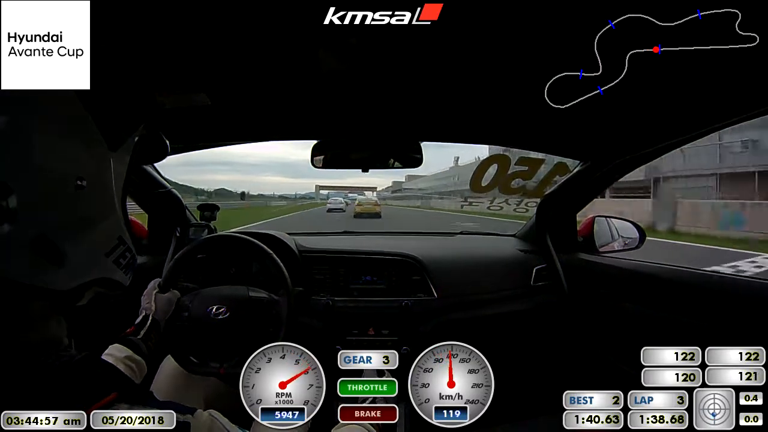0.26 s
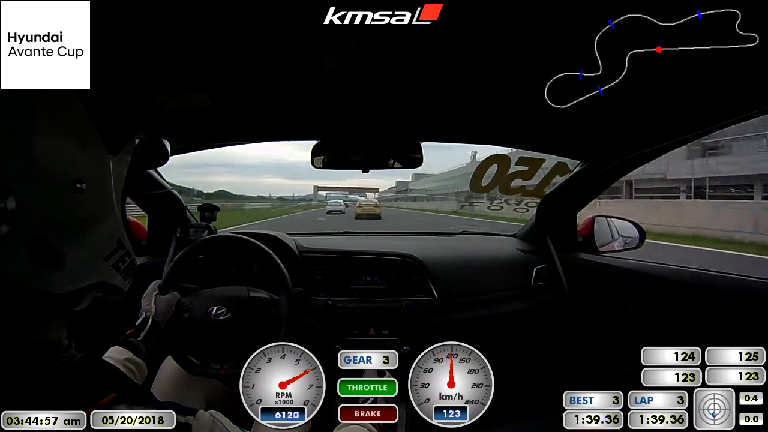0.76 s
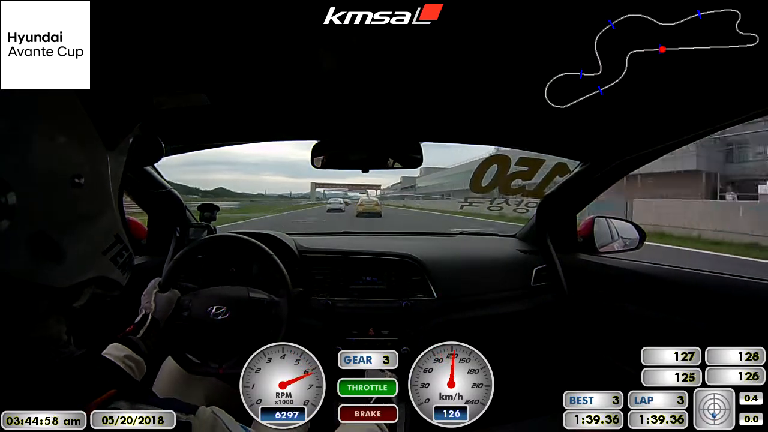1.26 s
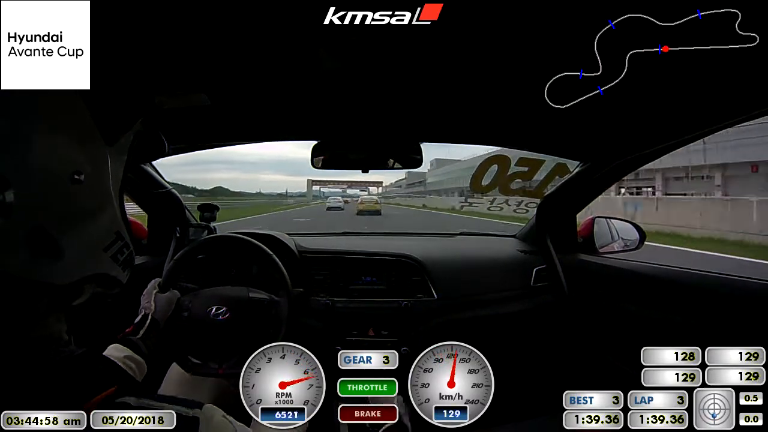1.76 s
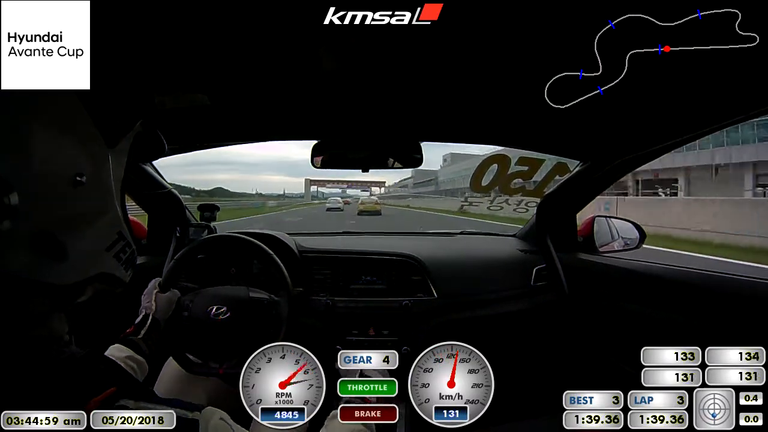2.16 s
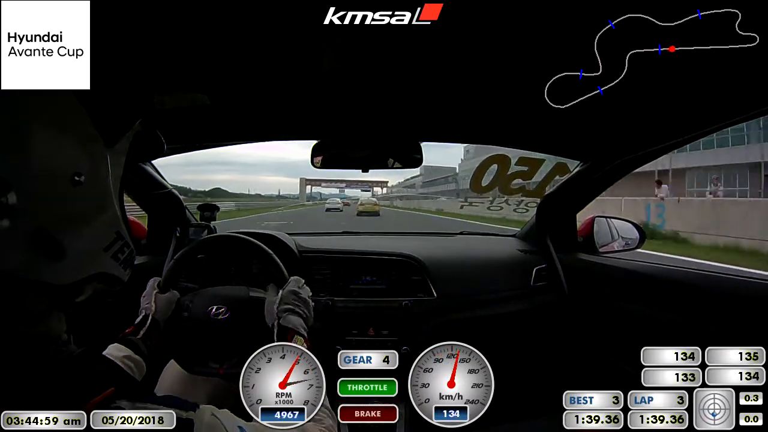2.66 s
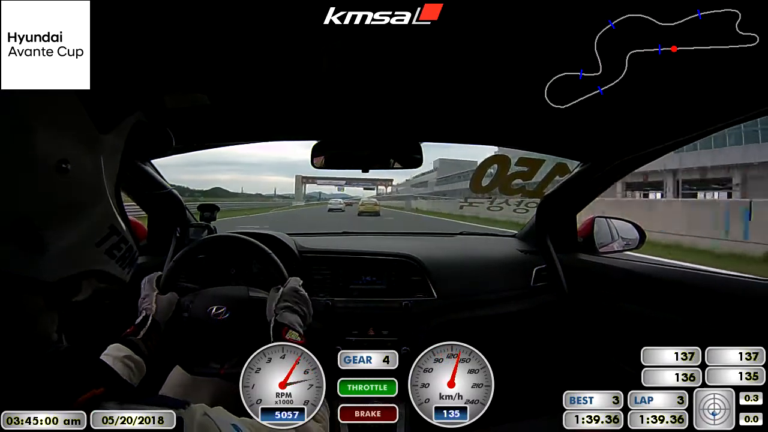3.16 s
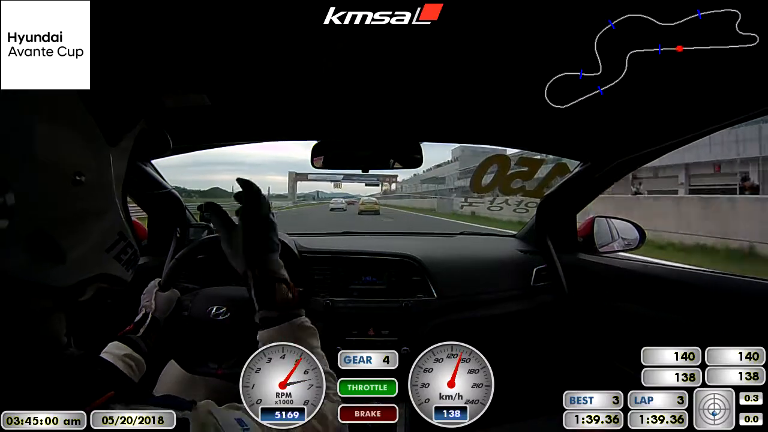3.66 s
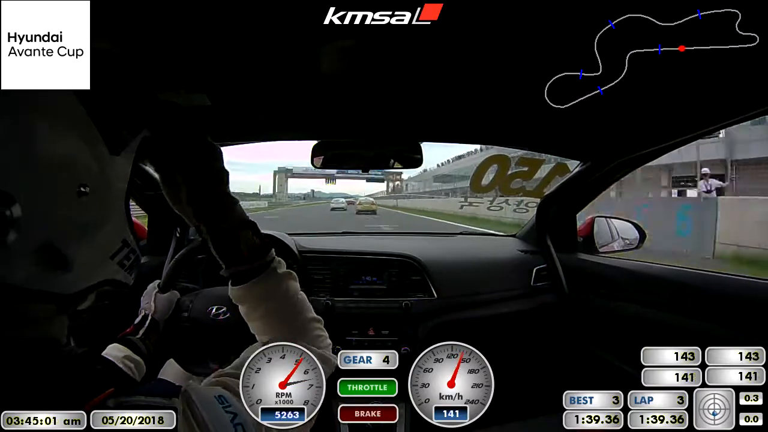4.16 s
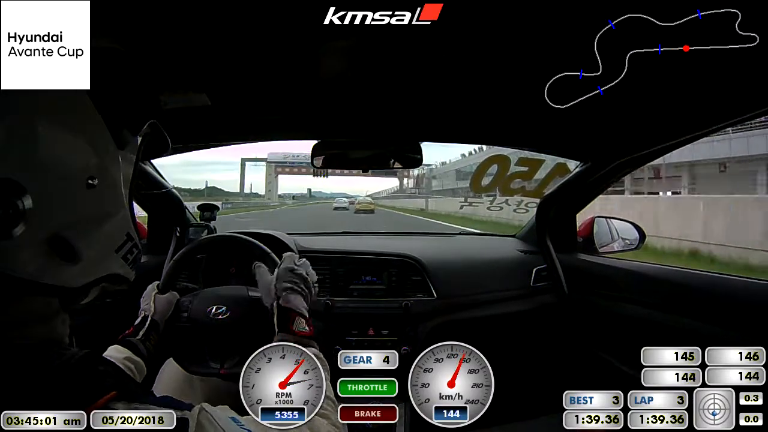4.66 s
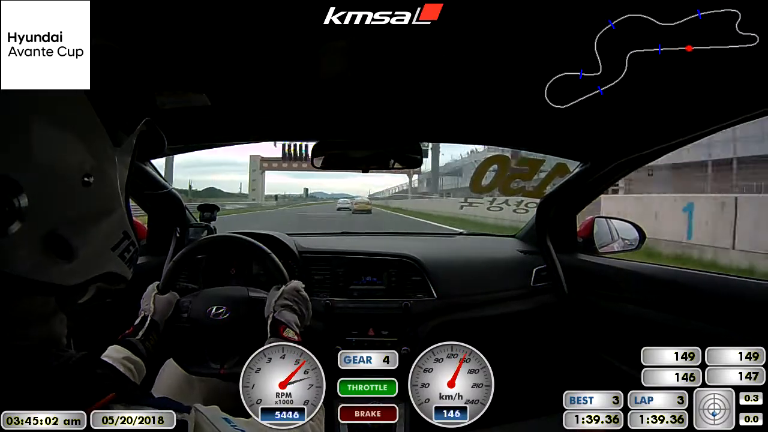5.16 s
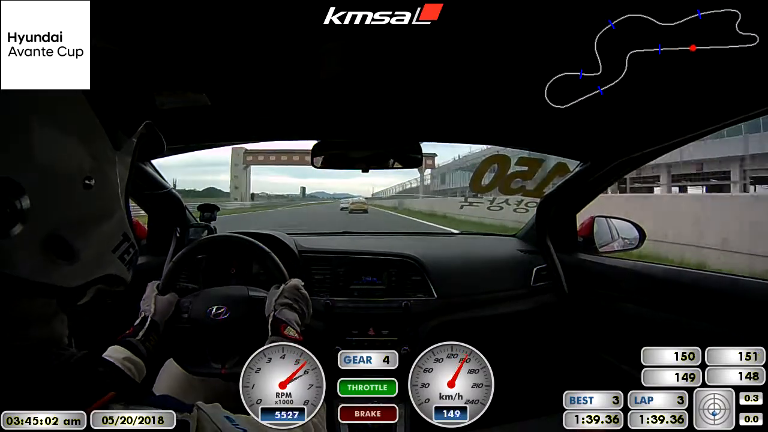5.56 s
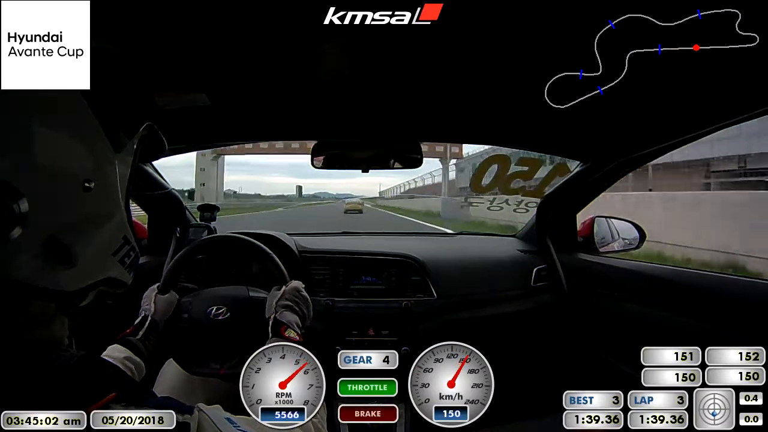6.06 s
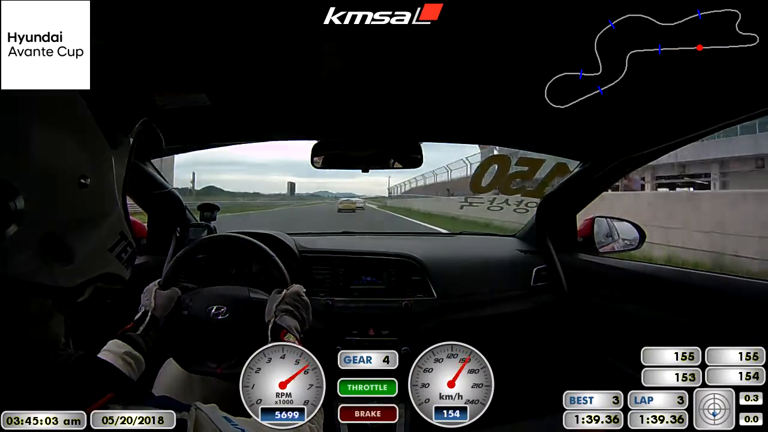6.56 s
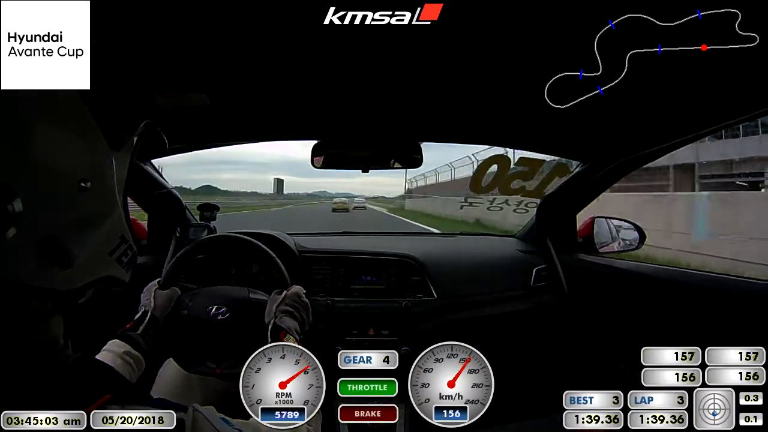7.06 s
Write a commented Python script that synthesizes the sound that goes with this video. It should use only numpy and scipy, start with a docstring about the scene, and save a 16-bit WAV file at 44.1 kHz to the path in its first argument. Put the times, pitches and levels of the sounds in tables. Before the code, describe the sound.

Muffled cabin sound of a racing car accelerating down a straight: low engine drone, one quick gear change, trim knocks, tyre rumble and wind.

```python
"""A four-cylinder engine pulls, shifts up once and pulls again inside a stripped race car on a straight.
Engine and exhaust are sines locked to the firing rate, tyres are sines locked to the wheels.
Road and wind are filtered noise; road joints and loose trim ring short decaying tones.
Engine, road, wind and a light patter pass body resonances and padding; the other sounds are added directly.
A low boom shakes the shell, a small metal part buzzes, and the recorder adds hiss and a faint whine."""
import sys
import numpy as np
from scipy import signal
from scipy.fft import rfft, irfft, next_fast_len
from scipy.io import wavfile
from scipy.ndimage import uniform_filter1d, map_coordinates

SR = 44100
rng = np.random.default_rng(int(sys.argv[2]) if len(sys.argv) > 2 else 0)


def materialize(psi):
    """Save the field psi as 16-bit PCM at rate SR to the path in sys.argv[1].

    A 1-D psi becomes a single channel; in a 2-D psi each row is a channel.
    """
    bounded = np.clip(np.atleast_2d(psi).T, -1, 1)
    quanta = np.round(bounded * 32767).astype(np.int16)
    wavfile.write(sys.argv[1], SR, quanta)


def volts(x):
    """Linear amplitude factor 10**(x/20) for a level x in dB, scalar or array-like."""
    e = np.asarray(x, float) / 20
    return 10 ** e


N = 323253
T = np.arange(N) / SR  # time of every sample, s


def unit(x):
    """Scaled to rms 1."""
    return x / np.sqrt(np.mean(x ** 2) + 1e-20)


def noise():
    """Plain white noise."""
    return rng.standard_normal(N)


def curves(rows):
    """One value per sample for each column after the time."""
    time_s, *columns = np.transpose(rows)
    return [np.interp(T, time_s, column) for column in columns]


def wobble(rate):
    """A smooth random curve through rate random points a second."""
    points = rng.standard_normal(int(N * rate / SR) + 4)
    return map_coordinates(points, [T * rate])


def humps(middle_s, half_s, level_db):
    """Sum of bell-shaped swells."""
    rows = np.broadcast(middle_s, half_s, level_db)
    return sum(volts(db) * np.exp(-.5 * ((T - middle) / half) ** 2) for middle, half, db in rows)


def filtered(x, response):
    """x times a complex response of frequency."""
    size = next_fast_len(N + SR // 2)  # spare room for the ringing
    hz = np.fft.rfftfreq(size, 1 / SR)
    return irfft(rfft(x, size) * response(hz), size)[:N]


def modes(table):
    """Response of resonances that ring after a push, neighbours of opposite sign."""
    def one(f, centre, width, db):
        return volts(db) * 1j * f * width / (centre * centre - f * f + 1j * f * width)
    return lambda f: sum((-1) ** k * one(f, *row) for k, row in enumerate(table))


def band(lo_hz, hi_hz):
    """Response of a second-order high-pass and low-pass."""
    return lambda f: (1j * f / (lo_hz + 1j * f)) ** 2 * (hi_hz / (hi_hz + 1j * f)) ** 2


def orders(table, rate_hz, waver_db, drift):
    """Sines on multiples of a shaft rate, each wavering in level and phase (drift in cycles)."""
    turns = np.cumsum(rate_hz) / SR
    total = 0
    for multiple, db in table.items():
        level = np.sqrt(2) * volts(db + waver_db * wobble(7))
        cycles = multiple * turns + rng.random() + drift * wobble(4.4)
        total = total + level * np.sin(2 * np.pi * cycles)
    return total


def sparse(rate, spread_db):
    """Random impulses of either sign, about rate a second, a few much larger than the rest."""
    chance, size, sign = rng.random((3, N))
    height = volts(-spread_db * np.log(size + 1e-4))
    return unit((chance < rate / SR) * height * np.sign(sign - .5))


def rings(events, table, attack_s):
    """Every blow rings the same modes, neighbours in opposite sense, at new strengths."""
    x, t = np.zeros(N + SR), T[:SR // 2]
    hz, level_db, t60_s = np.transpose(table)[:, :, None]
    sign = (-1) ** np.arange(len(table))[:, None]
    tones = sign * volts(level_db - 60 * t / t60_s) * np.sin(2 * np.pi * hz * t)
    luck = rng.standard_normal((len(events), len(table)))
    for (start_s, db), strength in zip(events, luck):
        blow = volts(db + 1.3 * strength) @ tones * (1 - np.exp(-t / attack_s))
        x[round(start_s * SR):][:len(t)] += blow
    return x[:N]


# how fast the wheels turn: [time_s, wheel_turns_per_s]
WHEEL_SPEED = [(0, 16.73), (.6, 17.29), (1.2, 17.81), (1.85, 18.2), (2.2, 18.46), (3, 19.07), (4, 19.81),
               (5, 20.52), (6, 21.21), (7.33, 22.11)]


def wheel_hz():
    """The wheels turn faster and faster down the straight."""
    return curves(WHEEL_SPEED)[0]


# gearbox; the engine flares, drops and catches the next gear: [time_s, firings_per_wheel_turn]
GEARBOX = [(0, 11.78), (1.55, 11.78), (1.8, 12.2), (1.87, 12.1), (1.93, 11.3), (2.03, 10.8), (2.12, 9),
           (2.22, 8.84), (7.33, 8.84)]


def firing_hz():
    """The engine follows the wheels through the gear."""
    return wheel_hz() * curves(GEARBOX)[0]


def load_db():
    """Load sags while the foot is off the throttle, jolts as the clutch bites and settles."""
    lift_s, bite_s = 1.82, 2.18  # foot off, clutch bites
    fall_s, settle_s = 0.22, 0.23
    lift_db, jolt_db = -5.5, 4.5  # before smoothing
    sag = lift_db * np.clip((T - lift_s) / fall_s, 0, 1) * (T < bite_s)
    jolt = jolt_db * np.exp(-abs(T - bite_s) / settle_s) * (T >= bite_s)
    return uniform_filter1d(sag + jolt, size=3000)


# engine tones, before load and body: {multiple_of_engine_cycle: level_db}
ENGINE_LINES = {1: -50.5, 2: -54, 3: -50, 5: -47, 6: -47, 7: -42, 8: -41, 9: -40, 10: -48, 11: -45.5, 12:
                -40, 13: -50.5, 14: -44.5, 15: -48.5, 16: -51.5, 18: -45.5, 20: -43, 22: -56, 24: -56}


def engine():
    """The block shakes on multiples of its four-firing cycle."""
    cycle_hz = firing_hz() / 4
    level = volts(load_db() + 1.9 * wobble(8.3))
    return level * orders(ENGINE_LINES, cycle_hz, waver_db=2.0, drift=0.033)


# what the exhaust pipe passes, before load: [firing_hz, level_db]
EXHAUST_PIPE = [(163, -36), (168, -39.5), (173, -42.5), (181, -43), (188, -44.5), (193.5, -36.5),
                (197, -34.5), (201, -39.5), (208, -46.5), (214, -37), (220, -33.5)]


def exhaust():
    """The pipe drones on the firing rate, a little uneven, loudest near its resonances."""
    pipe_db = np.interp(firing_hz(), *np.transpose(EXHAUST_PIPE))
    level = volts(pipe_db + load_db() + 1.5 * wobble(14))
    return level * orders({1: 0}, firing_hz(), waver_db=1, drift=.015)


# tyre tones, before the suspension: {multiple_of_wheel_turn: level_db}
TYRE_LINES = {1: -35, 2: -34, 3: -42, 4: -42, 5: -38, 6: -37, 7: -41, 8: -50, 9: -41, 11: -50, 12: -47}
# suspension resonances, each applied twice over: [pitch_hz, width_hz, level_db of one pass]
SUSPENSION = [(20, 14, 0), (38, 8, 0), (58, 20, -5), (85, 16, -7), (112, 10, 0), (146, 9, 0), (158, 9, -1),
              (220, 14, -1)]


def tyres():
    """Uneven tyres thump once and more per turn; a tone stands out as it crosses a suspension resonance."""
    level = volts(1.66 * wobble(10))
    thumps = level * orders(TYRE_LINES, wheel_hz(), waver_db=0, drift=0.024)
    return filtered(thumps, lambda f: sum(abs(modes([mode])(f)) ** 2 for mode in SUSPENSION))


# how coarse the asphalt is, before the body: [time_s, low_roar_drive_db, high_roar_drive_db]
ASPHALT = [(0, -8.5, -9), (.6, -14, -12), (1.3, -16, -11.5), (2, -13, -15), (2.9, -16.5, -14),
           (3.6, -15, -13.5), (4.7, -15, -13), (5.8, -13, -13.5), (6.7, -16.5, -13), (7.33, -8, -13)]


def road():
    """Coarse asphalt shakes the floor; the high part is grainy."""
    low_db, high_db = curves(ASPHALT)
    low = filtered(noise(), band(19, 400))
    grain = noise() + 0.47 * sparse(150, spread_db=1)
    high = filtered(grain, band(299, 3000))
    low_level = volts(low_db + 2.2 * wobble(6))
    high_level = volts(high_db + 0.6 * wobble(4) + 0.84 * wobble(12))
    return low_level * low + high_level * high


def wind():
    """Air rushes past the glass, louder with speed."""
    high_rush = filtered(noise(), band(1200, 1700))
    low_rush = volts(-8.5) * filtered(noise(), band(65, 130))
    speed_db = 60 * np.log10(wheel_hz() / 20)
    return volts(-10.5 + speed_db + 2.1 * wobble(5.6)) * (high_rush + low_rush)


def patter():
    """Small knocks patter all the time, each a short push on the body."""
    return filtered(volts(-17.5) * sparse(23, spread_db=1.5), band(800, 1200))


# the boom's strongest swells: [middle_s, half_length_s, peak_db above which the hum adds]
BOOM_SWELLS = [(.04, 0.055, -26.5), (.25, 0.049, -24.5), (.46, 0.049, -26), (.82, 0.036, -31),
               (1.608, .075, -23.5), (1.85, 0.042, -24), (2.0, .055, -22.5), (2.19, .04, -26.5),
               (2.45, 0.036, -27), (2.66, 0.06, -30), (3.14, .07, -30), (3.63, 0.083, -27),
               (4.25, 0.034, -30), (4.4, .035, -32), (5.0, .04, -30), (5.27, .04, -28), (6.12, .045, -26),
               (6.73, .045, -27), (7.11, .07, -31)]


def boom():
    """The shell booms on one low tone that swells and sags and wanders a little in pitch."""
    shell_hz, wander_hz = 33.3, .8
    hum_db = -38  # typical level between swells
    size = humps(*np.transpose(BOOM_SWELLS)) + volts(hum_db + 2.8 * wobble(10))
    hz = shell_hz + wander_hz * wobble(3.3)
    cycles = np.cumsum(hz) / SR + 0.16 * wobble(3.5)
    return np.sqrt(2) * size * np.sin(2 * np.pi * cycles)


# tones of the small metal part, relative to each other: [pitch_hz, width_hz, level_db]
METAL_PART = [(4100, 200, -8), (5180, 60, -7), (5430, 70, -1), (5610, 60, -2), (5770, 50, 0)]
# bursts of the buzz, before its flutter: [middle_s, half_length_s, level_db]
BUZZ_BURSTS = [(.14, .012, -62), (.4, 0.11, -68.5), (1.3, 0.083, -72), (1.51, 0.008, -61),
               (1.724, .012, -65.5), (2.495, 0.0085, -60.5), (3.773, 0.076, -64.5), (3.946, 0.026, -66),
               (4.08, .04, -67.5), (4.82, .03, -64.5), (5.0, .03, -65.5), (5.27, 0.027, -64.5),
               (5.565, 0.087, -63.5), (6.202, 0.069, -66.5), (6.57, .05, -67), (7.04, 0.024, -67)]


def buzz():
    """Tiny contacts ring a small metal part in bursts; one tone sings on between them."""
    between_db = -74.5  # before the flutter
    size = (humps(*np.transpose(BUZZ_BURSTS)) + volts(between_db)) * volts(1.6 * wobble(45))
    contacts = 0.89 * noise() + sparse(250, spread_db=2.5)
    rattle = unit(filtered(contacts, modes(METAL_PART)))
    tone = unit(filtered(noise(), modes([(5396, 70, 0)])))  # pitch_hz, width_hz, level_db
    song = volts(-71.5 + 1.2 * wobble(12)) * tone
    return size * rattle + song


# when the loose trim knocks, and how hard: [start_s, level_db]
TRIM_KNOCKS = [(0.0304, -22), (0.085, -27), (0.3632, -22), (0.755, -24), (0.8106, -21.5), (1.2031, -30),
               (1.264, -18.5), (1.4241, -21.5), (1.6402, -24.5), (1.8245, -16), (1.8626, -12.5),
               (1.9157, -23), (1.945, -27.5), (2.1351, -25), (2.1441, -19), (2.25, -21.5), (2.4136, -18.5),
               (2.94, -29), (2.995, -30), (3.151, -27), (3.258, -29.5), (3.67, -32), (4.07, -27),
               (4.5176, -23.5), (5.3004, -42)]
# what the trim rings with, relative to the knock: [pitch_hz, level_db, time_to_fade_60_db_s]
TRIM_TONES = [(539, -15, 0.094), (1015, -5.5, 0.046), (1068.5, -7, .1), (1180, -27.5, 0.047),
              (1550, -29.5, 0.037)]


def knocks():
    """A loose trim piece knocks and rings with short, sharp tones."""
    return rings(TRIM_KNOCKS, TRIM_TONES, attack_s=0.0007)


# joints in the road, and how hard they hit: [start_s, level_db]
ROAD_JOINTS = [(0.059, -26.5), (1.505, -14), (1.579, -19), (2.491, -14), (3.36, -27.5), (4.119, -33),
               (4.919, -26.5), (6.123, -29), (6.969, -40)]
# what a joint sets ringing in the floor pan: [pitch_hz, level_db, time_to_fade_60_db_s]
FLOOR_PAN = [(145.2, -6, 0.28), (164.6, -11.5, 0.3), (209, -5.5, 0.2), (413, -15, 0.43), (433, -18.5, 0.12),
             (550, -8, 0.08), (5370, -44, .03)]


def joints():
    """Each joint in the road sets the floor pan ringing, with a softer start."""
    return rings(ROAD_JOINTS, FLOOR_PAN, attack_s=0.008)


def padding(f):
    """Seats and lining swallow the treble; two panels cancel at one frequency."""
    node_hz, width_hz = 945, 25
    offset = node_hz ** 2 - f * f
    notch = (offset + .2j * f * width_hz) / (offset + 1j * f * width_hz)
    return notch / (1 + (f / 1900) ** 8)


# body resonances, before the padding: [pitch_hz, width_hz, level_db]
BODY_TONES = [(20, 17.5, 1.5), (33, 13.1, 5), (62, 16.7, -6.5), (88.1, 12.4, -5), (103.6, 14.1, -0.5),
              (139.3, 18.5, -0.5), (160, 15.1, 1.5), (193.9, 20, 0.5), (211.3, 15.1, 1), (259.6, 12.6, -7),
              (311.7, 35.7, -14.5), (412.1, 14.7, -9), (446.1, 17.5, -8), (499, 32.3, -12.5),
              (557.2, 21.2, -4.5), (625, 61.5, -17.5), (662.6, 48, -14.5), (798, 24, -20.5), (900, 60, -17),
              (984.7, 33.5, -10.5), (1059.7, 30.5, -6), (1168, 12, -22), (1411, 42, -23), (1592, 129, -24),
              (1711, 63, -20.5)]


def body(x):
    """The car body rings and its padding dulls what shakes it."""
    return filtered(x, lambda f: modes(BODY_TONES)(f) * padding(f))


def scene():
    """Engine, road, wind and patter pass the body; the other sounds are added directly."""
    shaken = body(engine() + road() + wind() + patter())
    direct = exhaust() + tyres() + boom() + buzz() + knocks() + joints()
    return (shaken + direct)[None]


# colour of the recorder hiss, relative: [pitch_hz, level_db per Hz]
HISS_COLOUR = [(1180, -19), (2000, -2), (3390, -3.5), (4050, -4), (4730, -4.5), (5520, -4.5), (5750, -5.5),
               (7080, -9), (8260, -24), (10700, -49), (18200, -120)]


def hiss():
    """Steady noise from the recorder, with its own colour."""
    pitch_hz, level_db = np.transpose(HISS_COLOUR)
    colour = lambda f: volts(np.interp(np.log(f + 1), np.log(pitch_hz), level_db))
    return volts(-59.5) * unit(filtered(noise(), colour))


# recorder whine: [pitch_hz, level_db]
WHINE_TONES = [(2000, -91.5), (3000, -80), (4000, -78.5), (5000, -77.5), (6000, -78.5), (7000, -81.5),
               (8000, -101.5)]


def whine():
    """Faint steady sines on multiples of the recorder's clock."""
    return sum(np.sqrt(2) * volts(db) * np.sin(2 * np.pi * (hz * T + rng.random())) for hz, db in WHINE_TONES)


def top_cut(x):
    """Nothing passes above the cut-off."""
    return signal.sosfilt(signal.butter(12, 8410, fs=SR, output="sos"), x)


def record(dry):
    """The recorder adds steady hiss and a faint whine."""
    mix = dry + hiss() + whine()
    return top_cut(mix)


dry = scene()
out = record(dry)
materialize(out)
```